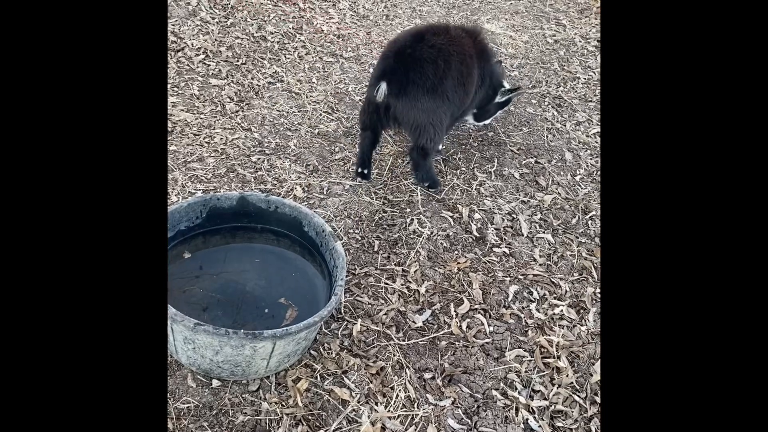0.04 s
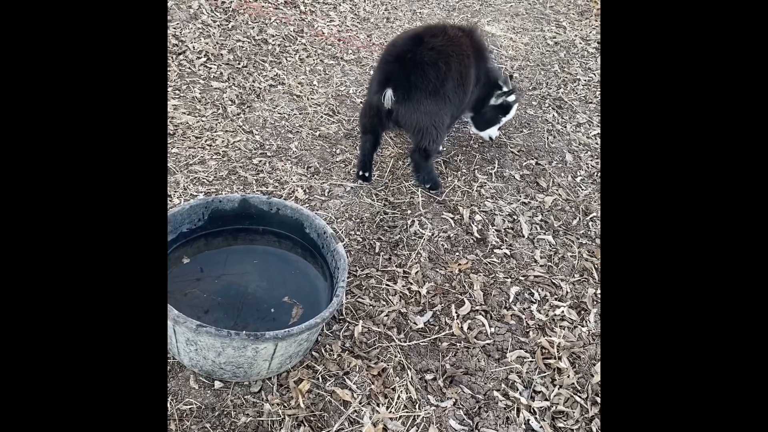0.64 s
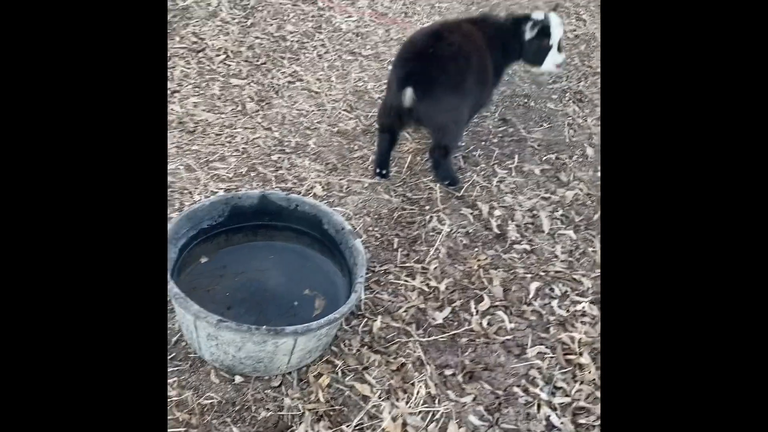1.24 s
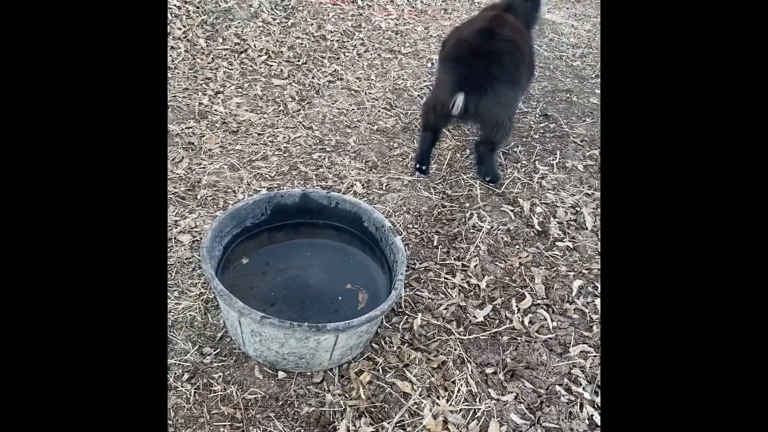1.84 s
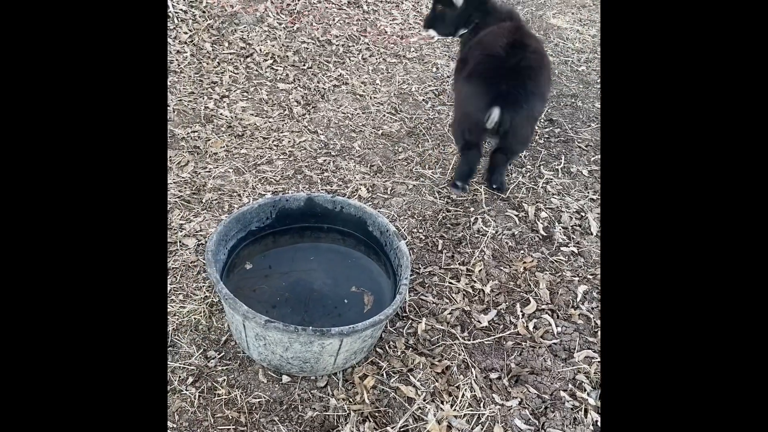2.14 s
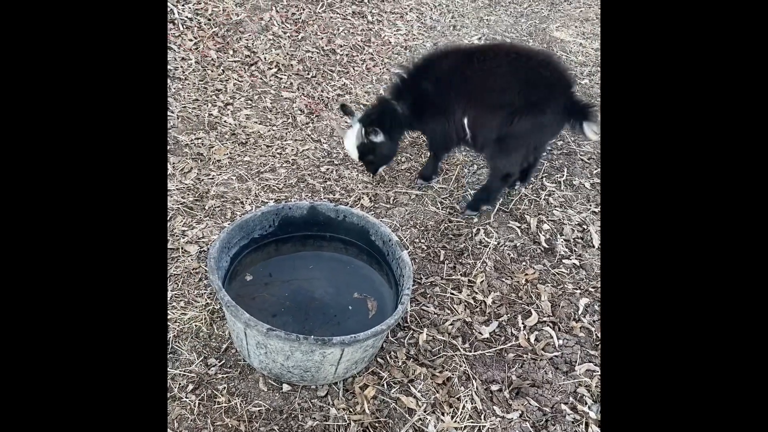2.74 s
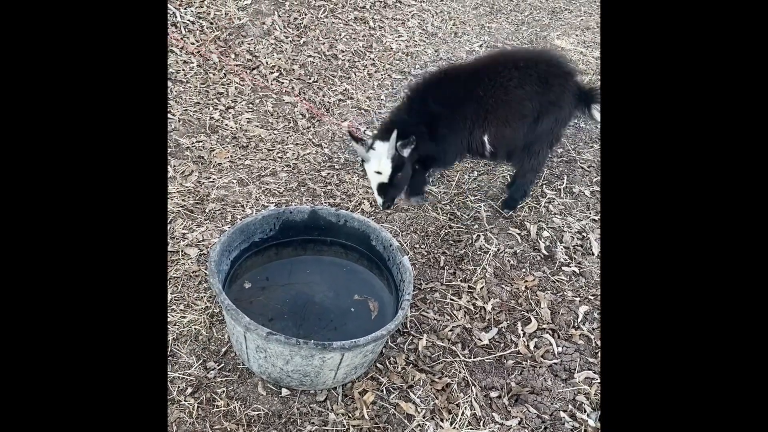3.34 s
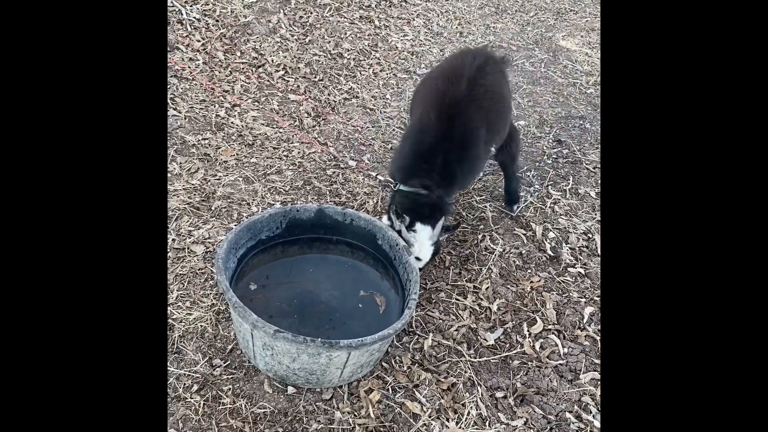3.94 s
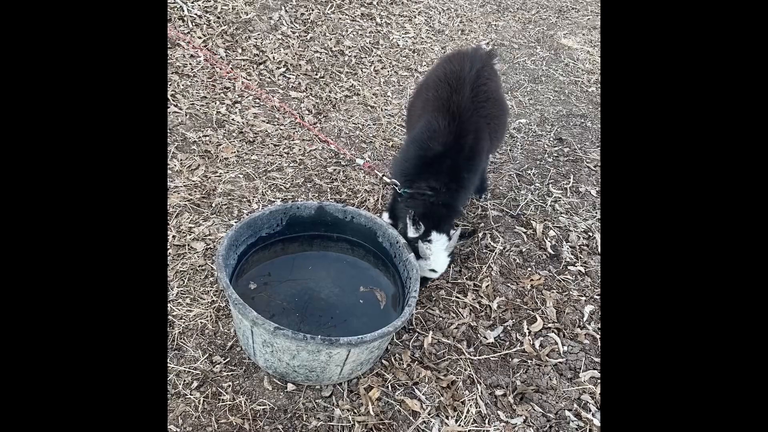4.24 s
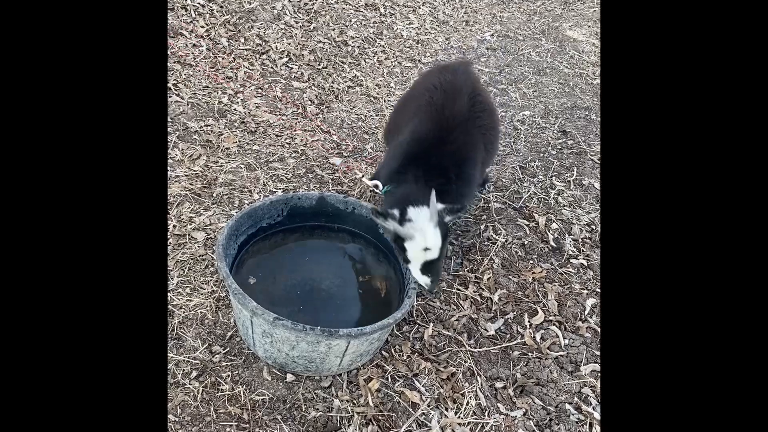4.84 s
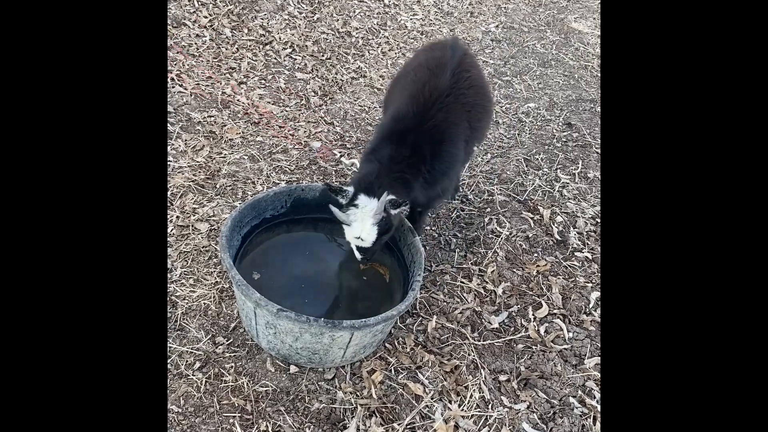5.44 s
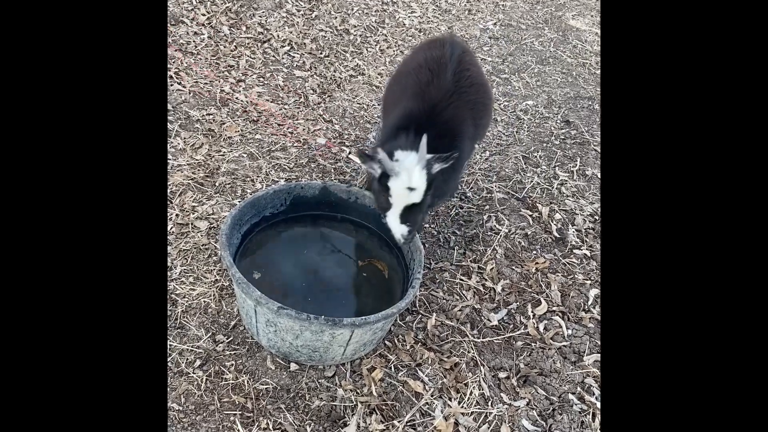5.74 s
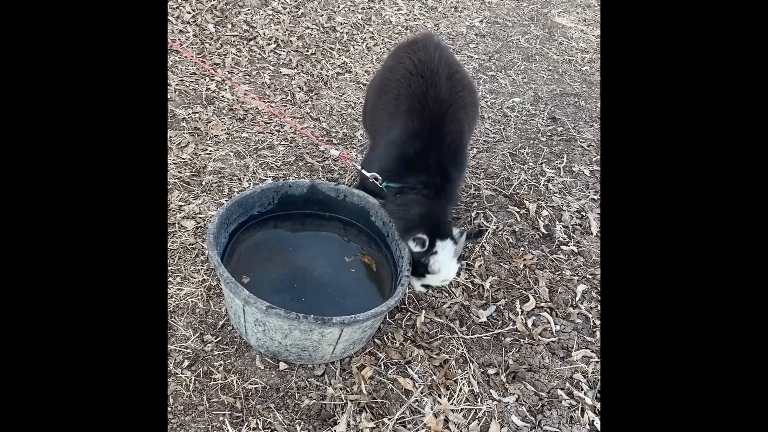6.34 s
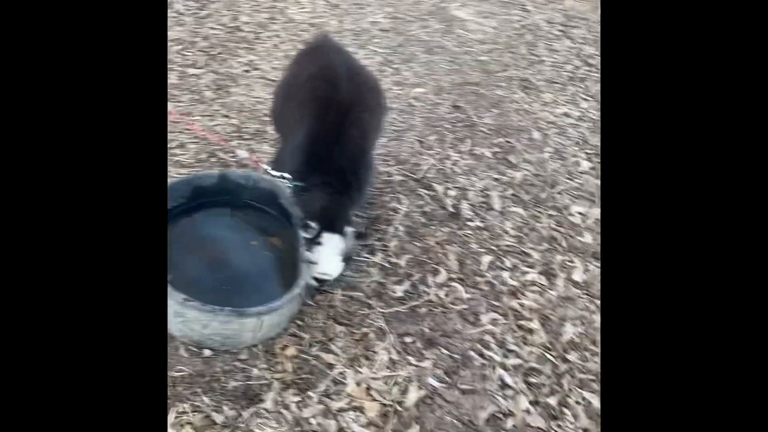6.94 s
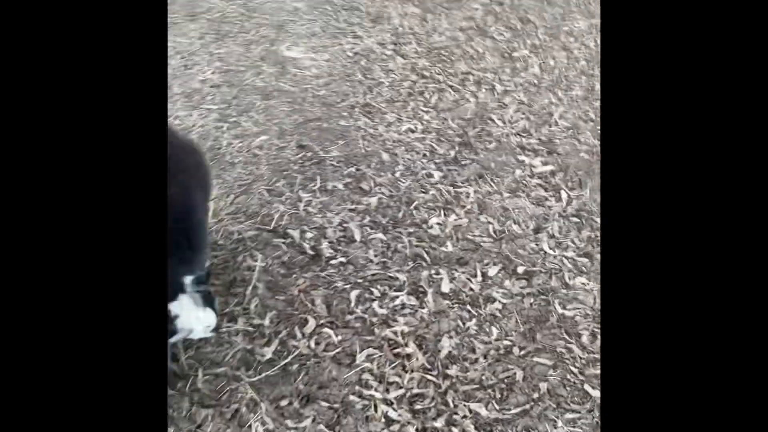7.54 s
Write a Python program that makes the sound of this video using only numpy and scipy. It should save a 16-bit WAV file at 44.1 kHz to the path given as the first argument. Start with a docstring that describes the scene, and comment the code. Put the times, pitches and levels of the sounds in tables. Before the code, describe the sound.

In an open yard, someone close to the microphone makes a quick run of squeaky kissing smacks. A young goat shuffles through dry leaves with light crackles and twig snaps, while a faint, low, buzzing moan rises, turns hoarse and stops. A second, louder run of kisses follows. Near the end come more rustling, a few dull knocks and one crunching footstep, over a faint outdoor rumble.

```python
"""An open yard, where a young goat walks over dry leaves to a water tub. Leaves crackle and twigs snap.
Someone close by calls the goat with two runs of kissing smacks: suction drags the lips open in quick
slips that ring the mouth. Between the runs one low, moaning drone, a pulse train with a hollow hum and
a thin buzz, rises, turns hoarse and breaks off. The caller takes a crunching step at the end.
A few dull knocks sound, and a faint outdoor rumble lies under it all."""
import sys
import numpy as np
from scipy import signal
from scipy.fft import rfft, irfft
from scipy.io import wavfile
from scipy.ndimage import uniform_filter1d

SR = 44100
rng = np.random.default_rng(int(sys.argv[2]) if len(sys.argv) > 2 else 0)


def to_wav(s):
    """Save 16-bit WAV."""
    ch = np.atleast_2d(s).T  # columns
    pcm = np.round(np.clip(ch, -1, 1) * 32767)  # PCM
    wavfile.write(sys.argv[1], SR, pcm.astype(np.int16))


N = 334349
TIME = np.arange(N) / SR


# Resonances of cheeks and teeth, common to all smacks: centre_hz, width_hz, level_db
CHEEKS_AND_TEETH = [(220, 110, -10.5), (930, 190, -7), (1935, 450, -3), (3150, 400, -2.5),
                    (3740, 360, -1.5), (9260, 2900, -16.5)]
def kiss(rise_s, level_db, squeak_hz, mouth_hz, mouth_db, lip_hz, ring_hz, ring_db):
    """Suction pulls the lips open in slips that come ever faster and merge into a squeak."""
    suction_db, hold_s, fall_s = 14.5, 0.0022, 0.0078
    t = np.arange(SR // 8) / SR
    gaps = np.maximum(0.32 * rise_s * 0.74 ** np.arange(60), 1 / squeak_hz)
    slip_s = np.append(0, np.cumsum(gaps + 0.00004 * rng.standard_normal(len(gaps))))
    from_peak = np.maximum(abs(slip_s - rise_s) - hold_s, 0)
    force_db = np.where(slip_s < rise_s, -suction_db * from_peak / rise_s,
                        -10 * (from_peak / fall_s) ** 1.28)
    force = amp(force_db + 1.1 * rng.standard_normal(len(slip_s)))
    slips = np.bincount((slip_s * SR).astype(int), force, len(t))[:len(t)]
    wet_decay = signal.lfilter([1], [1, -np.exp(-1 / (0.0021 * SR))], slips)
    drive = slips + 0.09 * wet_decay * rng.standard_normal(len(t))  # wet fizz after each slip
    opening = np.clip(t / rise_s, 0.4, 1)
    cavities = [(mouth_hz, 600, mouth_db), (lip_hz, 850, 0), (ring_hz, 700, ring_db)]
    cavities += [(hz, width, db - 0.5) for hz, width, db in CHEEKS_AND_TEETH]
    smack = 0
    for hz, width, db in cavities:
        let_in = drive * opening ** min(1200 / hz, 2)  # deep cavities speak as the lips open
        smack += amp(db) * resonate(resonate(let_in, hz, width), hz, width)
    smack = colour(smack, [(2050, 3), (2450, -6.5), (2850, 3.5), (6100, 3.5), (7000, 2.5),
                           (11000, -7.5), (13500, -13), (16000, -16)])
    smack *= np.clip((t[-1] - t) / 0.03, 0, 1) ** 2
    return amp(level_db) * smack / np.sqrt(np.sum(smack ** 2) / (0.027 * SR))


def lip_parting(length_s, level_db, from_hz, to_hz, hiss_db, tone_share):
    """The hollow of the mouth changes pitch as the lips come apart."""
    progress = np.linspace(0, 1, int(length_s * SR))
    hz = from_hz + (to_hz - from_hz) * progress
    breath = unit(resonate(resonate(rng.standard_normal(len(hz)), hz, 340), hz, 600))
    hollow = np.sqrt(1 - tone_share) * breath + np.sqrt(2 * tone_share) * np.sin(phase(hz))
    hiss_eq = [(400, -10), (1700, 3.5), (2500, -9.5), (3800, -4.5), (5800, -13), (7500, -21),
               (15000, -34)]
    hiss = unit(colour(rng.standard_normal(len(hz)), hiss_eq))
    envelope = np.minimum(progress / 0.16, 1) * (1 - progress) ** 0.53
    return amp(level_db) * (hollow + amp(hiss_db) * hiss) * envelope


# Lip smacks: start_s, peak_s, level_db, squeak_hz, mouth_hz, mouth_db, lip_hz, ring_hz, ring_db
KISSES = [(1.2532, 1.278, -44.5, 253.4, 880, -4.5, 4130, 5600, -11.5),
          (1.3398, 1.363, -29.5, 425.2, 1050, -4.5, 4770, 5700, -6),
          (1.493, 1.518, -33, 453.3, 1160, -2.5, 4750, 5500, -4),
          (1.5991, 1.623, -32.5, 433.2, 1255, -3, 4090, 5050, 0.5),
          (1.719, 1.742, -40.5, 377.6, 1240, 1, 4200, 5050, -1.5),
          (1.811, 1.836, -38.5, 516, 1315, 7.5, 3620, 4800, -2),
          (5.587, 5.613, -61, 307.6, 850, -6, 5450, 3900, -6.5),
          (5.663, 5.686, -45, 289.5, 858, -3.5, 5450, 3900, -7.5),
          (5.75, 5.77, -22, 450.3, 930, -4.5, 4010, 5950, -0.5),
          (5.8736, 5.903, -27, 427, 1420, -3, 4150, 6000, -6.5),
          (5.9866, 6.01, -26, 492.3, 1640, -2, 3960, 4950, -6)]
# Hollow tails as the lips part: start_s, length_s, level_db, from_hz, to_hz, hiss_db, tone_share
PARTINGS = [(1.382, 0.013, -34, 1150, 840, -7.5, 0.9), (1.391, .06, -50, 1148, 813, -4.5, .35),
            (1.858, 0.042, -49.5, 1408, 1560, 1.5, 0.45), (5.792, 0.042, -34.5, 1000, 645, -3, 0.2),
            (6.031, 0.048, -43.5, 1140, 834, 2, 0.2)]
def kissing_calls():
    """Two runs of smacks, a few of them trailed by the ring of the opening mouth."""
    out = np.zeros(N)
    for start_s, peak_s, *voicing in KISSES:
        add(out, start_s, kiss(peak_s - start_s, *voicing))
    for start_s, *voicing in PARTINGS:
        add(out, start_s, lip_parting(*voicing))
    return out


# The moan's rising pitch curve: time_s, pitch_hz
MOAN_PITCH = [(2.75, 114.6), (2.95, 122.9), (3.198, 142.9), (3.348, 150.5), (3.558, 175.6), (3.9, 198.4),
              (3.962, 197.6), (4.246, 205.9), (4.35, 200.6), (4.43, 202.8)]
# EQ of its hollow low layer: freq_hz, gain_db
HUM_EQ = [(80, -36), (125, 6.5), (152, -8.5), (200, 1.5), (295, -2.5), (400, -27.5), (610, -22), (800, -27),
          (1200, -53)]
# EQ of its buzzing top layer: freq_hz, gain_db
BUZZ_EQ = [(600, -48), (900, -9), (1150, 6), (1400, 6.5), (1750, 4.5), (2000, 4), (2300, 2), (2650, -7.5),
           (3300, -23), (4500, -52)]
def moan():
    """Steady pulses hum and buzz; near the top they alternate strong and weak and turn hoarse."""
    top_hz, hoarse_span_hz = 200, 11
    attack_s, release_s, buzz_start_s = 0.1, 0.053, 2.996
    times, pitches = np.transpose(MOAN_PITCH)
    glide_hz = np.interp(TIME, times, pitches)
    roughness = np.interp(glide_hz, [top_hz - hoarse_span_hz, top_hz], [0.042, 0.24])
    jitter = (0.0028 + 0.012 * roughness) * waver(77)
    angle = phase(glide_hz * (1 + jitter))
    sounding = (TIME >= times[0]) & (TIME <= times[-1])
    pulses = np.zeros(N)
    pulses[sounding] = np.cos(np.outer(angle[sounding], np.arange(1, 27))).sum(1)
    pulses *= 1 + 1.34 * roughness * np.cos(angle / 2)
    drive = pulses + 15 * roughness * rng.standard_normal(N)
    drive += 0.53 * resonate(drive, 8.4 * glide_hz, width_hz=260)  # a bright peak tracks the pitch
    octaves = np.log2(glide_hz / top_hz)  # both layers grow louder with pitch
    hum_gain = amp(-51.5 + 13 * octaves)
    buzz_gain = amp(-62.5 + 2.5 * octaves) * np.clip((TIME - buzz_start_s) / 0.11, 0.1, 1)
    out = 0
    for eq, gain in ((HUM_EQ, hum_gain), (BUZZ_EQ, buzz_gain)):
        layer = colour(drive, eq)
        running_rms = np.sqrt(abs(uniform_filter1d(layer ** 2, SR // 20)) + 1e-6)
        out += gain * layer / running_rms
    fade_in = np.clip((TIME - times[0]) / attack_s, 0, 1)
    fade_out = np.clip((times[-1] - TIME) / release_s, 0, 1)
    return out * fade_in * fade_out


# Bouts of shuffling in the leaves: start_s, hold_s, level_db
SHUFFLES = [(2.144, 0.57, -73), (2.74, 1.44, -78), (4.699, 0.26, -86.5), (6.513, 1.09, -72)]
# Single pushes of hoof or muzzle: peak_s, level_db, half_width_s
PUSHES = [(2.19, -59, 0.0096), (2.264, -63, 0.0073), (2.506, -63, 0.012), (2.58, -64.5, 0.02),
          (2.69, -67.5, 0.027), (2.974, -64.5, 0.014), (3.035, -65, 0.0091), (3.38, -72.5, 0.13),
          (4.026, -67, 0.037), (4.6, -73.5, 0.03), (4.755, -65, .018), (5.078, -70.5, .012),
          (5.202, -74, 0.016), (6.686, -63.5, 0.092), (6.955, -61, 0.034)]
def goat_effort():
    """Envelope of how hard the goat works the leaves: uneven shuffling, with pushes on top."""
    shuffle = sum(amp(db) * swell(start, hold, attack_s=0.035, release_s=0.026)
                  for start, hold, db in SHUFFLES)
    shuffle *= amp(2.5 * waver(16))
    push_power = sum(amp(db) ** 2 * np.exp(-((TIME - peak) / width) ** 2) for peak, db, width in PUSHES)
    return np.sqrt(shuffle ** 2 + push_power)


# Broad, crisp EQ of dry leaves: freq_hz, gain_db
LEAF_EQ = [(300, 5), (1000, -3.5), (2500, -3.5), (5000, -2.5), (7500, -2.5), (10500, -2.5), (13500, -4.5),
           (15500, -11), (17000, -36)]
def leaves(effort):
    """Hooves and muzzle crush dry leaves in clumps of crackles."""
    clumps = crackle(per_s=1100, spread_db=2.5, rub=0.35) * amp(1.73 * waver(82))
    return amp(6.5) * effort * unit(colour(clumps, LEAF_EQ))


def snap(level_db, body_db):
    """A sub-millisecond crack with a faint flutter of the leaf behind it."""
    t = np.arange(SR // 40) / SR
    burst = rng.standard_normal(len(t)) * (np.exp(-t / 0.00072) + 0.12 * np.exp(-t / 0.0075))
    eq = [(500, body_db + 1), (3000, body_db + 8.5), (6000, 0.12), (15000, -0.45)]
    crack = colour(np.roll(burst, SR // 2000), eq)
    return amp(level_db) * crack / np.sqrt(np.sum(crack ** 2) / (0.0018 * SR))


# Featured snaps: start_s, level_db, body_db
SNAPS = [(.0749, -52.5, -17), (0.2712, -63, -17), (2.2804, -37.5, -34), (2.3374, -36, -11),
         (2.4547, -43.5, -50), (2.8741, -46.5, -38), (3.045, -48, -22), (3.6553, -51.5, -22),
         (4.2907, -56, -16), (4.3744, -56, -19), (4.4483, -53, -29), (4.7245, -44, -29), (6.125, -54.5, -7),
         (6.508, -40, -15), (6.6726, -36, -9.5), (6.7236, -35, -17.5), (7.5506, -37.5, -4.5)]
def twigs(effort):
    """Twigs and stiff leaves break: a few loud snaps, and random lesser ones that follow the effort."""
    small_snaps_per_s = 22
    out = np.zeros(N)
    for start_s, level_db, body_db in SNAPS:
        add(out, start_s, snap(level_db, body_db))
    for when, size in rng.random((int(small_snaps_per_s * N / SR), 2)):
        over_effort_db = 5 + 19 * size
        add(out, when * N / SR, effort[int(when * N)] * snap(over_effort_db, body_db=-34))
    return out


# The shoe brushes, lands and rolls: start_s, hold_s, crunch_db, thud_db
SHOE_CONTACTS = [(7.291, 0.013, -55, -54.5), (7.326, 0.031, -43, -54), (7.39, 0.0074, -35, -33),
                 (7.412, 0.051, -44, -46), (7.543, 0.029, -52, -61.5)]
# Bright EQ of crushed leaf litter: freq_hz, gain_db
CRUNCH_EQ = [(500, -25), (1200, -9), (2300, 0), (3100, -4), (3650, -14), (4400, -9.5), (6500, -8),
             (12000, -14), (16000, -22)]
# Dull EQ of soil under weight: freq_hz, gain_db
SOIL_EQ = [(80, -6), (300, -7), (600, 1.5), (950, 4.5), (1500, -8.5), (3000, -33)]
def footstep():
    """A shoe crunches the litter and presses into the soil."""
    crunch_power = thud_power = 0
    for start, hold, crunch_db, thud_db in SHOE_CONTACTS:
        crunch_power += (amp(crunch_db) * swell(start, hold, attack_s=0.0053, release_s=0.022)) ** 2
        thud_power += (amp(thud_db) * swell(start, hold, attack_s=0.0013, release_s=0.013)) ** 2
    crunch = unit(colour(crackle(per_s=3000, spread_db=5.5, rub=0.48), CRUNCH_EQ))
    thud = unit(colour(crackle(per_s=1500, spread_db=4.5, rub=0.45), SOIL_EQ))
    return np.sqrt(crunch_power) * crunch + np.sqrt(thud_power) * thud


# Soft knocks: start_s, level_db, from_hz, to_hz, rise_s
KNOCKS = [(.462, -44.5, 142, 127, 0.023), (6.934, -30.5, 1050, 195, 0.0018),
          (6.958, -40.5, 950, 215, 0.0035), (7.045, -42, 870, 212, 0.0028)]
def knocks():
    """Dull knocks whose pitch drops as they die."""
    out, t = np.zeros(N), np.arange(SR // 4) / SR
    for start_s, level_db, from_hz, to_hz, rise_s in KNOCKS:
        hz = to_hz + (from_hz - to_hz) * np.exp(-t / (0.73 * rise_s))
        envelope = (t / rise_s * np.exp(1 - t / rise_s)) ** 2
        add(out, start_s, amp(level_db) * envelope * np.sin(phase(hz)))
    return out


# Reverb time of the yard: freq_hz, t60_s
YARD_DECAY = [(200, .3), (1800, 0.43), (3600, 0.58), (5000, 0.4), (16000, .15)]
def yard_echo(x, early_db, tail_db):
    """Quick scatter from the ground, then a faint tail from fences and trees."""
    hz, frame_s, noise = signal.stft(rng.standard_normal((2, SR)), SR, nperseg=256)
    decay = amp(-60 * frame_s / curve(YARD_DECAY, hz)[:, None])
    t = TIME[:SR]
    tail = signal.istft(noise * decay, SR, nperseg=256)[1][:, :SR] * np.minimum(t / 0.0067, 1)
    early = rng.standard_normal((2, SR)) * np.exp(-t / 0.0057) * (t > 0.001)
    impulse = (amp(early_db) * unit(early) + amp(tail_db) * unit(tail)) / np.sqrt(SR)
    return signal.fftconvolve(x[None], impulse, axes=1)[:, :N]


# Bass-heavy EQ of the outdoor bed: freq_hz, gain_db
AIR_EQ = [(20, -42.5), (45, -8), (88, -0.5), (115, -10.5), (250, -22.5), (380, -28), (820, -22),
          (1600, -43), (3700, -56), (5500, -53), (7500, -68), (11000, -54.5), (14000, -73)]
# How alike the bed is in both ears: freq_hz, coherence
AIR_COHERENCE = [(130, 0.99), (300, 0.51), (640, 0), (1400, 0), (3000, 0.2), (7000, 0.33)]
def outdoor_air():
    """Distant rumble, alike in both ears, under a wide soft hush."""
    left, independent = rfft(rng.standard_normal((2, N)))
    coherence = curve(AIR_COHERENCE, bins(TIME))
    right = coherence * left + np.sqrt(1 - coherence ** 2) * independent
    bed = unit(colour(irfft(np.array([left, right]), N), AIR_EQ))
    balance = amp([[0.7], [-0.7]])
    return amp(-55) * bed * amp(0.27 * waver(3.5)) * balance


# Phase offset between the channels: freq_hz, left_lead_rad
STEREO_PHASE = [(200, 0), (500, -.6), (860, -.9), (1500, -.1), (2500, .2), (5400, .5), (6900, 3),
                (8000, 3.3), (9500, 6.1), (11500, 6.4), (12900, 9.2), (14300, 9.6), (15500, 12.5)]
def pan(x, left_db):
    """A source reaches left and right with a difference of level and phase."""
    right = irfft(rfft(x) * np.exp(-1j * curve(STEREO_PHASE, bins(x))), N)
    return np.array([x * amp(left_db / 2), right * amp(-left_db / 2)])


def crackle(per_s, spread_db, rub):
    """Tiny fractures of very unequal size over a smooth rubbing hiss."""
    sizes = amp(spread_db * np.minimum(rng.exponential(1, N), 4.5)) * rng.choice([-1, 1], N)
    fractures = unit(sizes * (rng.random(N) < per_s / SR))
    return unit(fractures + rub * rng.standard_normal(N))


def resonate(x, hz, width_hz):
    """A resonance of gain 1 that may glide."""
    carrier = np.exp(1j * phase(hz * np.ones(len(x))))
    pole = np.exp(-np.pi * width_hz / SR)
    return 2 * (carrier * signal.lfilter([1 - pole], [1, -pole], x / carrier + 1e-18)).real


def swell(start_s, hold_s, attack_s, release_s):
    """Gain that grows up to start_s, holds, and dies away."""
    falloff = np.maximum((start_s - TIME) / attack_s, (TIME - start_s - hold_s) / release_s)
    return np.exp(-np.clip(falloff, 0, 40))


def waver(rate_hz):
    """Random modulation of rms 1, rolling off above rate_hz."""
    lowpass = np.exp(-(bins(TIME) / rate_hz) ** 2)
    return unit(irfft(rfft(rng.standard_normal(N)) * lowpass, N))


def colour(x, eq):
    """Filters x with a (freq_hz, gain_db) curve."""
    return irfft(rfft(x) * amp(curve(eq, bins(x))), x.shape[-1])


def curve(points, hz):
    """Reads a table on a log-frequency axis."""
    freqs, values = np.transpose(points)
    return np.interp(np.log(hz + 1), np.log(freqs + 1), values)


def bins(x):
    """Frequencies of the spectrum of x."""
    return np.fft.rfftfreq(x.shape[-1], 1 / SR)


def phase(hz):
    """Running phase of a pitch curve, in radians."""
    return 2 * np.pi * np.cumsum(hz) / SR


def amp(db):
    """Decibels to gain."""
    return 10 ** (np.asarray(db) / 20)


def unit(x):
    """Scales to rms 1."""
    return x / np.sqrt(np.mean(x ** 2) + 1e-20)


def add(mix, start_s, sound):
    """Mixes a sound in at start_s."""
    part = mix[max(round(start_s * SR), 0):][:len(sound)]
    part += sound[:len(part)]


def scene():
    """Caller, goat and drone in the open yard; the moan's buzz gets the most reverb."""
    effort = goat_effort()
    caller = kissing_calls()
    litter = leaves(effort) + twigs(effort)
    step = footstep()
    drone = moan()
    caller_left_db = np.interp(TIME, [2, 5], [-2, 1.8])  # first run to the right, second to the left
    direct = pan(caller, caller_left_db) + pan(drone, left_db=2.3) + pan(litter, left_db=-0.3)
    direct += pan(step, left_db=3) + pan(knocks(), left_db=2.5)
    buzz_send = colour(drone, [(250, -27), (900, 0.5)])  # only the buzz echoes; the low hum stays dry
    echoes = yard_echo(caller, early_db=-10.5, tail_db=-27)
    echoes += yard_echo(litter + step, early_db=-12.5, tail_db=-34)
    echoes += yard_echo(buzz_send, early_db=-4, tail_db=-6)
    return direct + echoes + outdoor_air()


def record(dry):
    """A steep low-pass trims the very top of the mix."""
    cutoff_hz = 16300
    lowpass = signal.firwin(511, cutoff_hz, window=("kaiser", 9), fs=SR)
    return signal.oaconvolve(dry, lowpass[None], "same")


dry = scene()
out = record(dry)
to_wav(out)
```